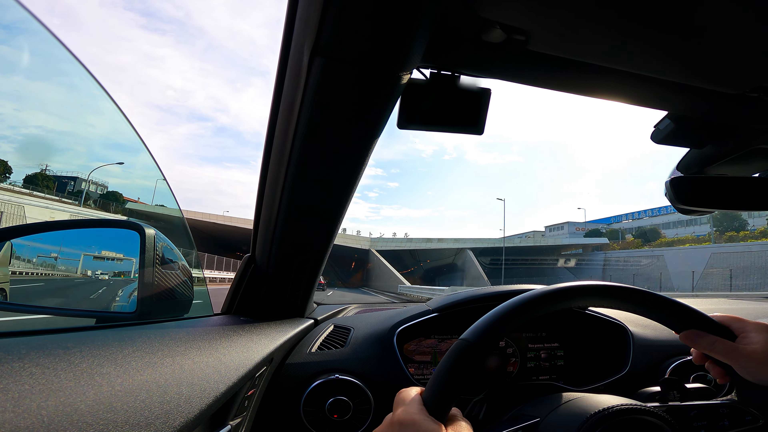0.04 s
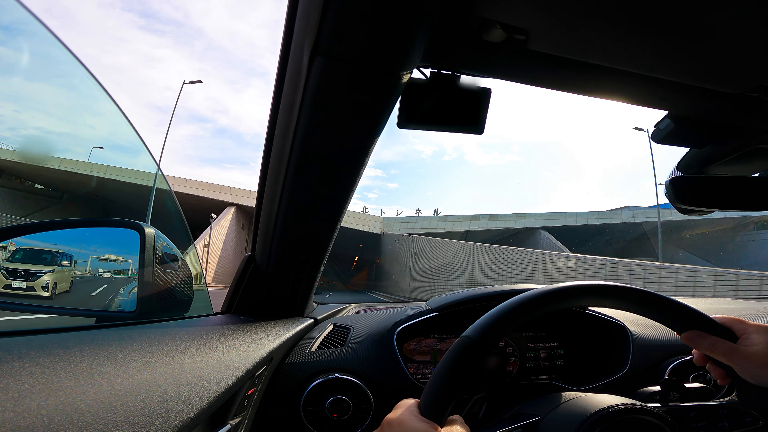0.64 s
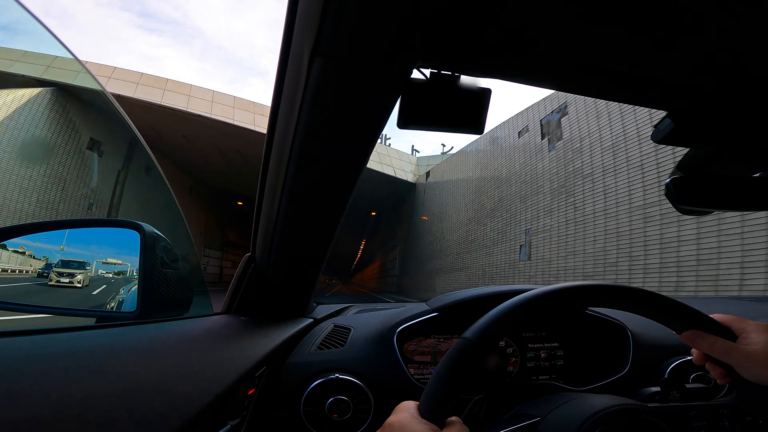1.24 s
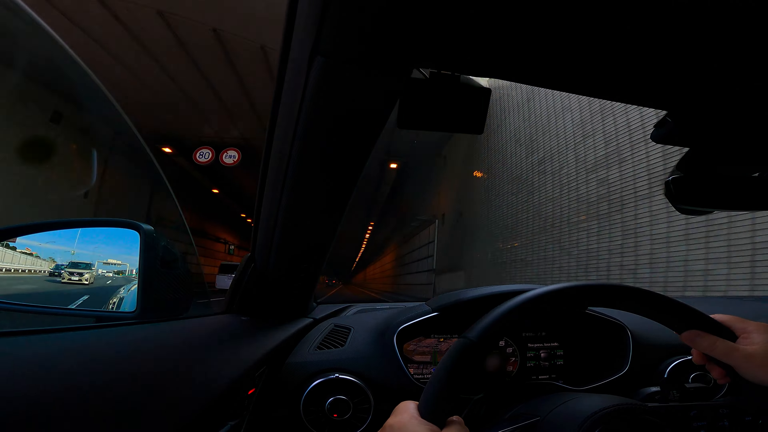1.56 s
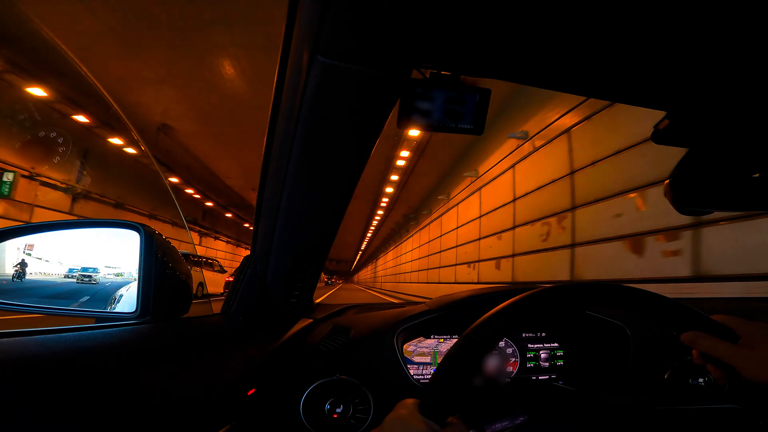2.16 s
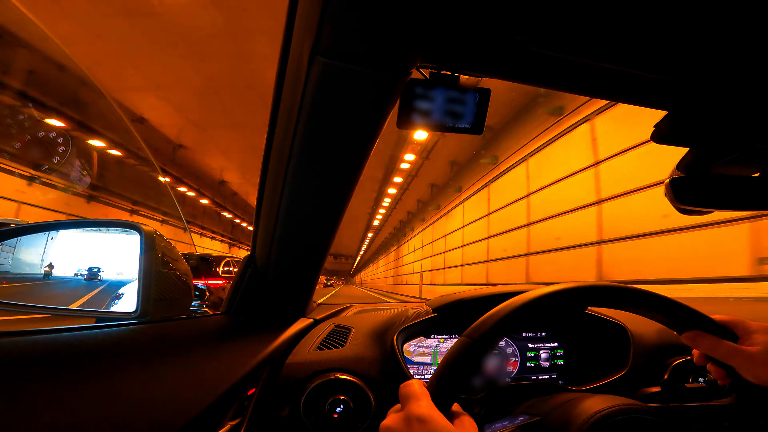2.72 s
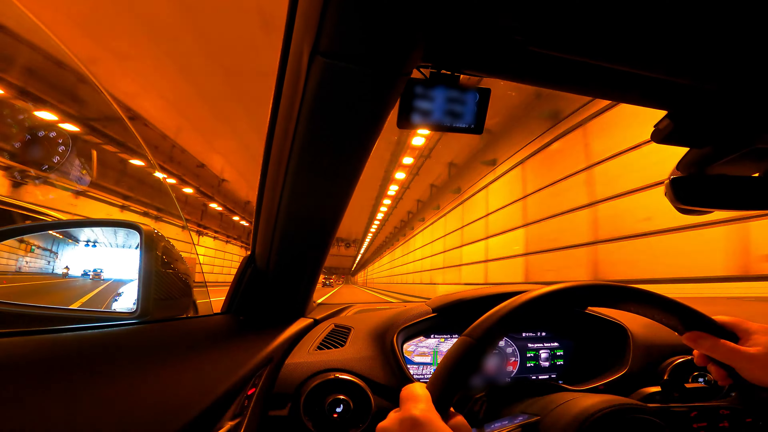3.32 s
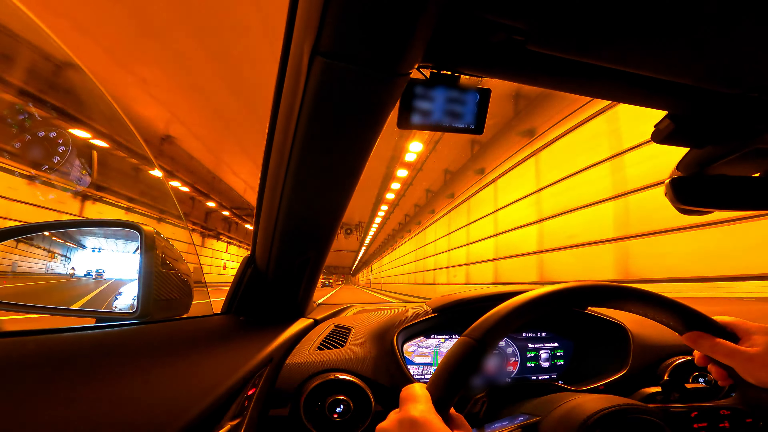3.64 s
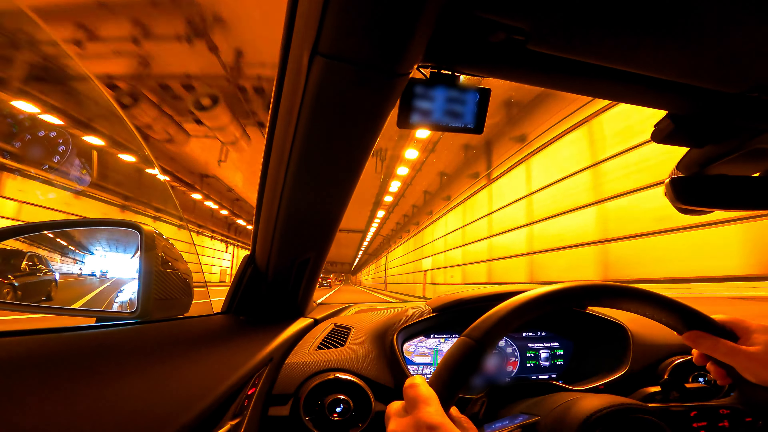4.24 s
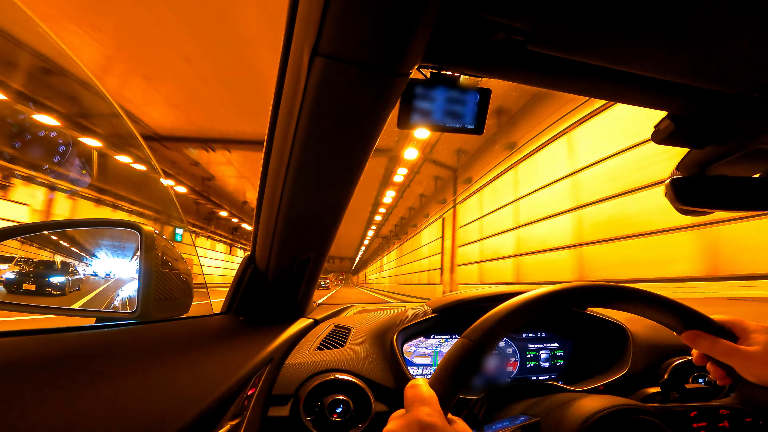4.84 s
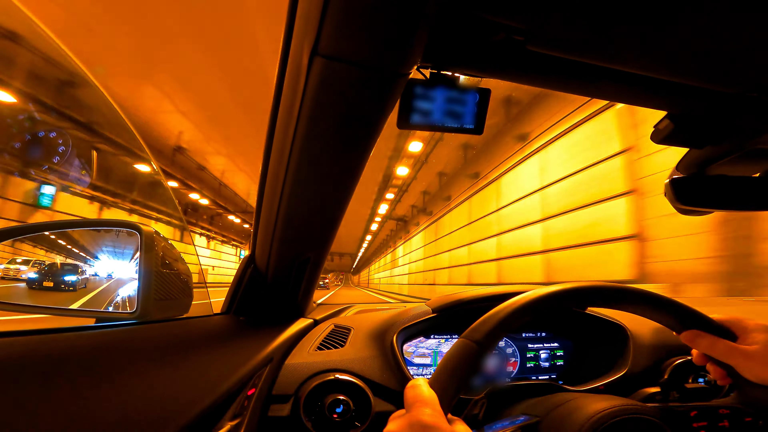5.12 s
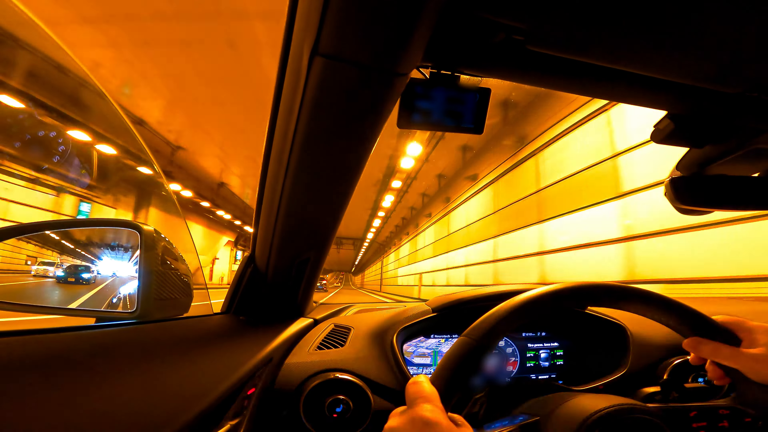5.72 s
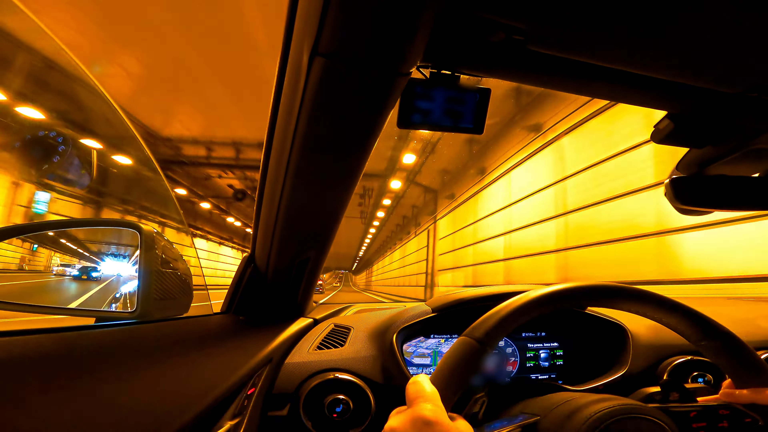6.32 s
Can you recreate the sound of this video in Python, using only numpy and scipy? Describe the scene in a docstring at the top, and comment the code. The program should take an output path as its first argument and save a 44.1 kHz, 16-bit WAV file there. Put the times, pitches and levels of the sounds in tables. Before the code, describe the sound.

Inside a car at highway speed, the engine downshifts and then pulls over deep rumble and tyre roar that grows fuller in a tunnel.

```python
"""Inside a five-cylinder turbo car at expressway speed: the body rumbles, tyres roar, air hisses past.
At 1 s the engine drops a gear and the car enters a tunnel, whose walls throw the tyre noise back in.
The revs hunt, then step up for a second lower gear by 2.8 s. Tyre noise swells beside another car
at 3.4 s, and a road seam knocks the trim at 3.7 s. From about 4.9 s the engine pulls, its note
swelling and rising as the turbo spools up, until the throttle lifts at the very end."""
import sys
import numpy as np
from scipy import signal
from scipy.fft import rfft, irfft
from scipy.io import wavfile
from scipy.ndimage import uniform_filter1d, minimum_filter1d

SR = 44100
rng = np.random.default_rng(int(sys.argv[2]) if len(sys.argv) > 2 else 0)


def wrap_up_sound(samples):
    """Save the sound to the file named by the first command line argument, as 16-bit audio."""
    columns = np.atleast_2d(samples).T
    # keep every value between -1 and 1, then stretch to whole-number steps
    tamed = np.clip(columns, -1, 1)
    steps = np.round(tamed * 32767).astype(np.int16)
    wavfile.write(sys.argv[1], SR, steps)


N = 289737
TIME = np.arange(N) / SR
BINS = np.fft.rfftfreq(N, 1 / SR)
FADE = signal.windows.tukey(N, .001)

TUNNEL_S, PASSING_S = 1.11, 3.38  # the tunnel mouth; a car in the next lane
SMOOTH_PATCH_S = 3.26  # a short stretch of smooth asphalt
SETTLES_S, SETTLES_DB_PER_S = 3.7, -1.2  # deep in the tunnel the road is more level and shakes less


def from_db(db):
    """Decibels to gain."""
    return 10 ** (np.asarray(db) / 20)


def unit(x):
    """Scales to rms 1."""
    return x / np.sqrt(np.mean(x ** 2) + 1e-20)


def since(start_s):
    """Seconds gone by since a moment; zero before it."""
    return np.maximum(TIME - start_s, 0)


def bell(middle_s, width_s):
    """A smooth hump of height 1."""
    return np.exp(-((TIME - middle_s) / width_s) ** 2)


def swell(top_s, rise_s, decay_s):
    """A smooth rise to 1, then an exponential decay."""
    return np.exp(-(np.minimum(TIME - top_s, 0) / rise_s) ** 2 - since(top_s) / decay_s)


def over_time(points):
    """An automation curve, read at every sample."""
    return np.interp(TIME, *np.transpose(points))


def over_pitch(points, at=BINS):
    """A curve over log frequency, read by default at every bin."""
    hz, value = np.transpose(points)
    return np.interp(np.log(at + 1), np.log(hz + 1), value)


def drift(rate_hz, size=N // 100):
    """Smooth random modulation of rms 1, rolling off above the rate."""
    hz = np.fft.rfftfreq(size, N / SR / size)
    coarse = irfft(rfft(rng.standard_normal(size)) / (1 + (hz / rate_hz) ** 4), size)
    return unit(np.interp(TIME, np.linspace(0, N / SR, size), coarse))


def enclosed(entry_s=1.12):
    """The tunnel walls closing in: 0 in the open, 1 inside."""
    return np.minimum(since(TUNNEL_S) / entry_s, 1)


# the cabin's stereo tilt: f/Hz, left minus right/dB
BALANCE = [(60, 1.5), (320, 1.5), (740, 3), (1500, 2), (2600, 3), (5000, 2), (8000, 0.5), (12000, -4)]
# phase lead of the left side: f/Hz, lead/rad
PHASE_LEAD = [(60, 0), (200, -0.22), (520, -0.42), (1000, -0.32), (1810, -0.036), (2760, 0.24),
              (5000, -0.042)]
def stereo(left, right):
    """Two spectra to a stereo pair; the cabin skews their level and phase. The centre has rms 1."""
    skew = from_db(over_pitch(BALANCE) / 2) * np.exp(.5j * over_pitch(PHASE_LEAD))
    pair = irfft(np.array([left * skew, right / skew]), N)
    return pair / np.sqrt(np.mean(pair.mean(0) ** 2))


def place(sound):
    """Sets a mono source in the cabin's stereo image, at its own level."""
    spectrum = rfft(sound * FADE)
    return np.std(sound) * stereo(spectrum, spectrum)


# resonances that the road keeps ringing: f/Hz, width/Hz, lift/dB
CABIN_MODES = [(186, 34, 5), (560, 180, 3.5), (911.5, 11, 5.5)]
# how alike left and right are: f/Hz, coherence/0-1
COHERENCE = [(60, 0.98), (180, 0.99), (300, 0.91), (520, 0.94), (1500, 0.9), (2600, 0.74), (5000, 0.83),
             (8000, 0.63), (12000, .2)]
def cabin_noise(spectrum, level_db, flutter_db, flutter_hz):
    """A diffuse noise bed coloured by the cabin's resonances, fluttering in level."""
    lift_db = sum(db / (1 + (2 * (BINS - hz) / width) ** 2) for hz, width, db in CABIN_MODES)
    roll_off = 1 / np.maximum(1, BINS / spectrum[-1][0]) ** 4
    colour = from_db(over_pitch(spectrum) + lift_db) * roll_off
    alike = over_pitch(COHERENCE)
    left, unrelated = rfft(rng.standard_normal((2, N)))
    right = alike * left + np.sqrt(1 - alike ** 2) * unrelated
    return stereo(left * colour, right * colour) * from_db(level_db + flutter_db * drift(flutter_hz))


# EQ of the window hiss and of its airy top: f/Hz, level/dB
HISS_EQ = [(700, -11.5), (2100, -2), (3200, -0.5), (4700, -3), (5600, -6.5), (6600, -9), (8000, -16.5),
           (10200, -19.5), (10800, -25.5), (12650, -22.5), (13050, -37), (15300, -34.5)]
SIZZLE_EQ = [(5000, -17), (6800, 2), (10000, 1.5), (12600, -3.5), (13100, -20.5)]
# brief swells of the hiss: t/s, width/s, lift/dB
HISS_SWELLS = [(.41, .05, 1.4), (.56, .08, 2.5), (.82, .08, .8), (1.1, .1, 1.1), (1.8, .1, 1.5), (3.4, .3, 1.9),
               (5.3, .1, 1), (5.9, .17, 3.3)]
def air():
    """Turbulent hiss along the windows, lifted by brief swells; in the tunnel the sizzle fades first."""
    swells_db = sum(db * bell(s, width_s) for s, width_s, db in HISS_SWELLS)
    hiss = cabin_noise(HISS_EQ, -45 - .87 * since(3.05) + swells_db, flutter_db=.5, flutter_hz=35)
    sizzle = cabin_noise(SIZZLE_EQ, -65 - 4 * since(TUNNEL_S) + swells_db, flutter_db=1.5, flutter_hz=10)
    return hiss + sizzle


# EQ of the body's sub rumble, drumming floor pan and low-mid drone: f/Hz, level/dB
RUMBLE_EQ = [(5, -14.5), (14, -2), (22, -1), (32, -1.5), (48, 0.5), (62, -6.5), (80, -7.5), (110, -17.5),
             (200, -52), (500, -88)]
FLOOR_PAN_EQ = [(35, -46), (60, -5.5), (80, -3), (100, -7), (125, -4.5), (180, -25.5), (400, -70.5)]
DRONE_EQ = [(70, -28), (110, -15), (140, 3), (180, -0.5), (220, -4), (280, -7), (330, -3.5), (410, -12.5),
            (600, -19.5), (2000, -81.5)]
def body():
    """The tyres shake the body and its panels; the floor pan ducks on the smooth asphalt."""
    smooth = bell(SMOOTH_PATCH_S, width_s=.25)
    rumble_db = -19.5 + SETTLES_DB_PER_S * since(SETTLES_S) + .5 * smooth
    drone_db = -25.5 + 2.5 * enclosed() + .33 * since(TUNNEL_S)
    rumble = cabin_noise(RUMBLE_EQ, rumble_db, flutter_db=-2, flutter_hz=2.5)
    floor_pan = cabin_noise(FLOOR_PAN_EQ, -25 - 12 * smooth, flutter_db=0, flutter_hz=14)
    drone = cabin_noise(DRONE_EQ, drone_db, flutter_db=.5, flutter_hz=13)
    return rumble + floor_pan + drone


# EQ of the hollow boom: f/Hz, level/dB
BOOM_EQ = [(170, -45), (222, -9), (243, 1), (258, 5.5), (275, -.5), (298, -0.5), (380, -58)]
# crests of its swells: t/s, level/dB
BOOM_SWELLS = [(.13, -31.5), (1.87, -23), (2.3, -28.5), (2.799, -29), (3.55, -23), (3.9, -28),
               (4.27, -26.5)]
def cabin_boom():
    """The cabin air booms in quick swells that sink back to a quiet bed."""
    swells = sum(from_db(db) * swell(s, rise_s=.045, decay_s=.26) for s, db in BOOM_SWELLS)
    return (from_db(-38) + swells) * cabin_noise(BOOM_EQ, 0, flutter_db=-.7, flutter_hz=11)


# EQ of the singing tread, the midrange roar and the brighter wash: f/Hz, level/dB
TREAD_EQ = [(400, -45.5), (560, -11), (650, -13.5), (760, 4), (850, 1.5), (920, 4.5), (1080, 3),
            (1300, -3.5), (2500, -44)]
ROAR_EQ = [(200, -37), (420, -2.5), (490, 1.5), (560, 2), (630, -1), (730, -1), (850, -7), (1080, -12.5),
           (1300, -35), (4000, -75)]
WASH_EQ = [(300, -20.5), (560, -16.5), (730, -3.5), (830, -7), (920, -0.1), (1080, -2), (1250, -2.5),
           (1600, -4), (2000, -10), (2600, -16), (3500, -22), (5000, -28.5), (8000, -56.5), (14000, -90)]
# coarser and finer asphalt under the tread: t/s, width/s, lift/dB
ASPHALT = [(.77, 0.11, -3), (1.17, 0.069, -5), (1.5, 0.06, 4), (2.5, .1, 0.5), (3.15, .12, 1.5),
           (3.92, 0.097, -0.5), (4.25, 0.13, -3), (5.66, 0.091, -9.5), (5.96, .12, 1.5), (6.45, .1, -3)]
def tyres(wash_thins_s=5.14):
    """Airborne tyre noise, louder and brighter off the tunnel walls, swelling beside another car."""
    passing = bell(PASSING_S, width_s=.37)
    coarse_db = sum(db * bell(s, width_s) for s, width_s, db in ASPHALT)
    tread_db = -33.5 + coarse_db + 6 * passing
    roar_db = -31 + 1.5 * enclosed() + 1.24 * since(TUNNEL_S)
    wash_db = -36.5 + 10 * enclosed() - 2 * since(wash_thins_s) + .23 * coarse_db + passing
    tread = cabin_noise(TREAD_EQ, tread_db, flutter_db=1, flutter_hz=26)
    roar = cabin_noise(ROAR_EQ, roar_db, flutter_db=.4, flutter_hz=8)
    wash = cabin_noise(WASH_EQ, wash_db, flutter_db=.4, flutter_hz=16)
    return tread + roar + wash


def wheels(turn_hz=15.5, level_db=-19.5, harmonics_db=(0, -2.5, -10), wobble=.024):
    """Each turn of the slightly unbalanced wheels rocks the body: a slow flutter of pressure."""
    angle = 2 * np.pi * np.cumsum(turn_hz * (1 + wobble * drift(.85))) / SR
    shake = sum(from_db(db + .86 * drift(3)) * np.cos(k * angle + 2 * np.pi * rng.random())
                for k, db in enumerate(harmonics_db, 1))
    return from_db(level_db + SETTLES_DB_PER_S * since(SETTLES_S)) * place(unit(shake))


# modes of a trim panel: f/Hz, level/dB, t60/s
TRIM_MODES = [(544, 0, .09), (721, -15, .05), (910, -13, .05), (1280, -16, .03)]
def trim_knock(at_s=3.708, gain_db=-8.7, attack_s=.0038):
    """A tyre strikes a seam in the road and a panel gives one dull, quickly damped knock."""
    t = since(at_s)
    ring = sum(from_db(db - 60 * t / t60) * np.sin(2 * np.pi * hz * t) for hz, db, t60 in TRIM_MODES)
    return place(from_db(gain_db) * np.minimum(t / attack_s, 1) * ring)


# the revs step up as the gearbox drops two gears: t/s, new firing rate/Hz, settling time/s
REV_STEPS = [(0.999, 129.6, 0.075), (2.47, 140.5, 0.15), (2.8, 167.9, 0.054)]
def firing_rate(pull_s, turbo_lag_s, cruise_hz=109.5, climb_hz_per_s=15.4):
    """Firings per second: the revs settle on each new step, then climb as the turbo spools up."""
    hz = np.full(N, cruise_hz)
    for start_s, new_hz, settle_s in REV_STEPS:
        hz = new_hz + (hz - new_hz) * np.exp(-since(start_s) / settle_s)
    pulling_s = since(pull_s)
    return hz + climb_hz_per_s * (pulling_s - turbo_lag_s * (1 - np.exp(-pulling_s / turbo_lag_s)))


# EQ from the exhaust to the seat: f/Hz, level/dB
EXHAUST_EQ = [(110, -27.5), (130, -23.5), (150, -23.5), (165, -16.5), (173, -20.5), (181, -17),
              (225, -20.5), (258, -17.5), (285, -19), (322, -22), (362, -22), (369, -34.5), (480, -35),
              (502, -20), (517, -25), (527, -22.5), (546, -21), (560, -24), (585, -37.5), (672, -35),
              (690, -20.5), (735, -22), (800, -34), (1105, -41)]
# narrow peaks and notches of the cabin's standing waves: f/Hz, width/Hz, lift/dB
STANDING_WAVES = [(176, .5, -12), (178.3, 1, 4.5), (336.6, 1.1, -12), (345.8, 2.4, 5), (352, 1.8, -7),
                  (359.5, 1, -4), (506, 1.5, 2.5), (510.3, .8, -9), (513.8, 1.4, -10), (523.2, 1.3, -15),
                  (536.2, 1, -15), (538.8, 1.6, 4), (543, 1, -9), (709, 3, -13), (717.5, 2, 3),
                  (723, 1.6, -11)]
def exhaust_path(hz):
    """Gain in dB at the seat: a harmonic swells and dips as it climbs through the standing waves."""
    ripple_db = sum(db * np.exp(-((hz - centre) / width) ** 2) for centre, width, db in STANDING_WAVES)
    return over_pitch(EXHAUST_EQ, hz) + ripple_db


# burble automation: t/s, level/dB
BURBLE_LEVEL = [(0, -40.5), (2.8, -32), (3.05, -27), (3.35, -24), (3.5, -41.5), (4.55, -37), (4.8, -28),
                (4.95, -36.5), (5.6, -38), (5.85, -24.5), (6.05, -34), (6.25, -26), (6.57, -31.5)]
def burble(cycle_phase, order=8, jitter_rad=.6):
    """The strongest beat of the uneven cylinders, a sixth above the note."""
    level_db = over_time(BURBLE_LEVEL) + 2 * drift(23)
    return from_db(level_db) * np.cos(order * cycle_phase + jitter_rad * drift(14))


# partials of the growl: multiple of the four-stroke cycle rate, level/dB
GROWL_ORDERS = [(2, -10.5), (3, -2), (4, -4.5), (6, -5.5), (7, -19), (9, -1.5), (11, -4.5), (12, -10),
                (14, -15.5), (16, -5.5), (17, -25.5), (18, -4), (21, -13), (25, -23), (27, -12)]
def growl(cycle_phase, throttle_db, jitter_rad=.6):
    """Small differences between cylinders fill in the orders around the note's harmonics."""
    partials = 0
    for order, db in GROWL_ORDERS:
        phase = order * cycle_phase + jitter_rad * drift(18) + 2 * np.pi * rng.random()
        partials += from_db(db) * np.cos(phase)
    return from_db(-31 + .24 * throttle_db) * unit(partials)


# throttle automation, a blip for each lower gear, the pull, the lift: t/s, level/dB
THROTTLE = [(0, -7), (.95, -9.5), (1.15, -3), (1.42, -6), (1.55, -12.5), (1.74, -7), (1.87, -.5),
            (2.1, -5.5), (2.7, -5), (2.95, -3.2), (3.09, -3), (3.18, -7.2), (3.42, -7.5), (3.6, -13),
            (4.5, -12), (4.61, -5.5), (4.8, -2), (5.1, -1), (6.3, 0.3), (6.5, -.3), (6.57, -13)]
def engine(cylinders=5, pull_s=4.85, turbo_lag_s=.78, brightening=.6, upper_db=-8.5, throb_hz=14):
    """Five firings a cycle make the note; throttle swells and brightens it, boost roughens it."""
    firing_hz = firing_rate(pull_s, turbo_lag_s)
    throttle_db = over_time(THROTTLE)
    boost = np.minimum(since(pull_s + turbo_lag_s) / turbo_lag_s, 1)
    jitter_rad = (.08 + .08 * boost) * drift(25)  # firings land a little early or late
    shifting = bell(2.2, width_s=.4155)  # between the downshifts the revs hunt and the note stumbles
    wander = .0017 * drift(5.9) + .01 * shifting * drift(12.4)
    firing_phase = 2 * np.pi * np.cumsum(firing_hz * (1 + wander)) / SR + jitter_rad
    note = 0
    for k in range(1, 7):
        level_db = throttle_db * (1 + brightening * (k - 1)) + exhaust_path(k * firing_hz)
        level_db += upper_db * (k > 3)  # upper harmonics leave the pipe weaker
        waver_db = .15 * k * drift(5)
        shimmer_db = (2 + 2.6 * boost * (k > 1)) * drift(33)
        stumble_db = shifting * drift(6)
        # only the fundamental throbs, in level and in timing
        throb_db = (k == 1) * 2.1 * drift(throb_hz)
        throb_rad = (k == 1) * .33 * drift(throb_hz)
        gain = from_db(level_db + waver_db + shimmer_db + stumble_db + throb_db)
        note += gain * np.cos(k * firing_phase + throb_rad + 2 * np.pi * rng.random())
    cycle_phase = firing_phase / cylinders
    return place(np.sqrt(2) * (note + burble(cycle_phase)) + growl(cycle_phase, throttle_db))


def scene():
    """The mix at the driver's seat."""
    return engine() + wheels() + body() + cabin_boom() + tyres() + trim_knock() + air()


def record(dry):
    """A limiter eases rare high peaks down; a steep low-pass trims the top."""
    ceiling_db, cutoff_hz = -.5, 15500
    allowed = np.minimum(1, from_db(ceiling_db) / (abs(dry).max(0) + 1e-9))
    held = minimum_filter1d(allowed, size=801)
    gain = uniform_filter1d(uniform_filter1d(held, size=401), size=401)
    low_pass = signal.ellip(10, .1, 90, cutoff_hz, fs=SR, output="sos")
    return signal.sosfilt(low_pass, dry * gain * FADE)


dry = scene()
out = record(dry)
wrap_up_sound(out)
```